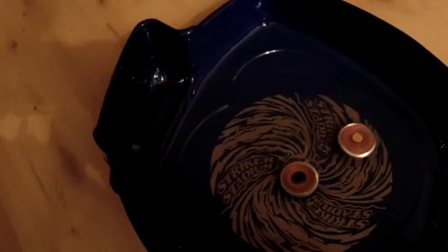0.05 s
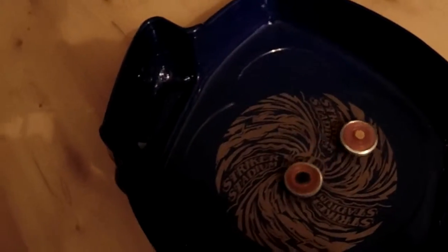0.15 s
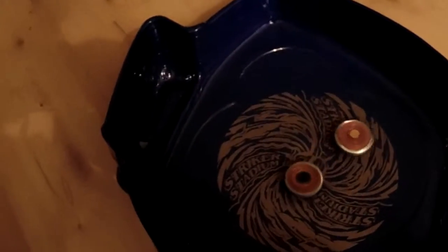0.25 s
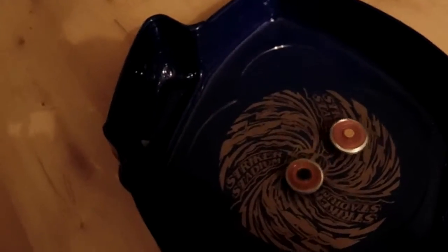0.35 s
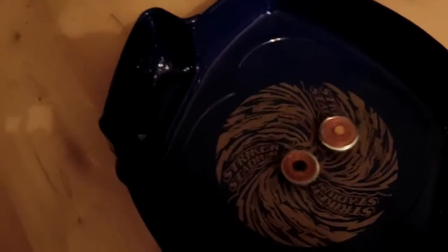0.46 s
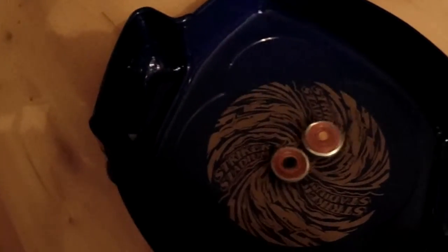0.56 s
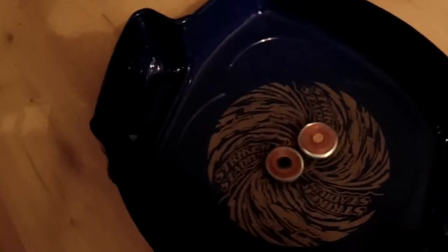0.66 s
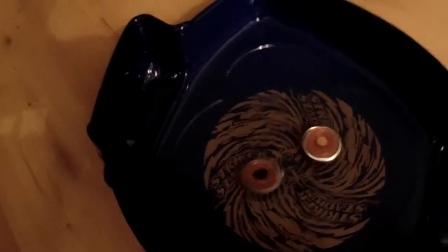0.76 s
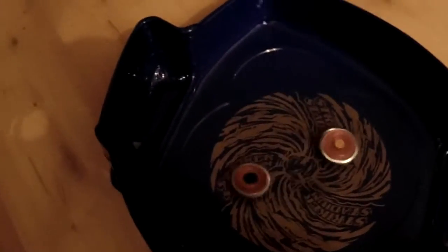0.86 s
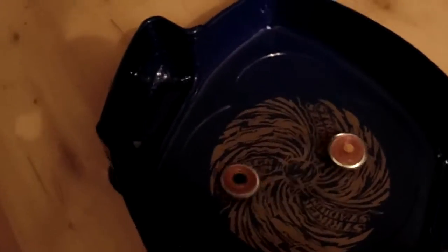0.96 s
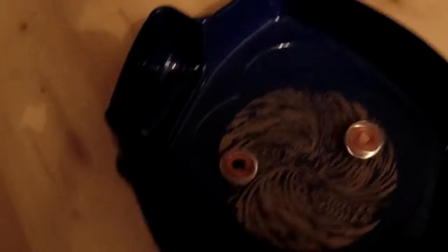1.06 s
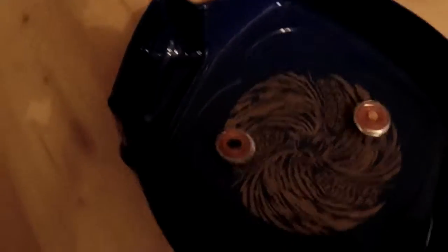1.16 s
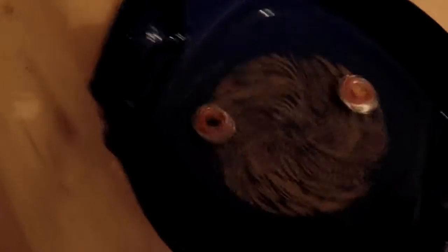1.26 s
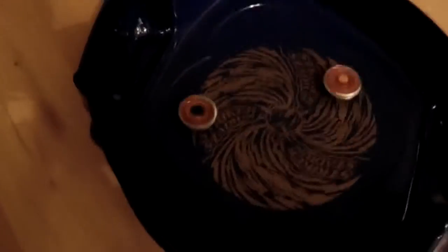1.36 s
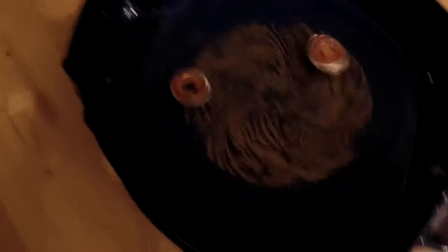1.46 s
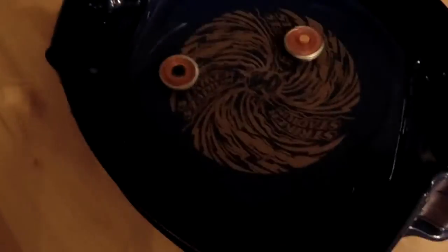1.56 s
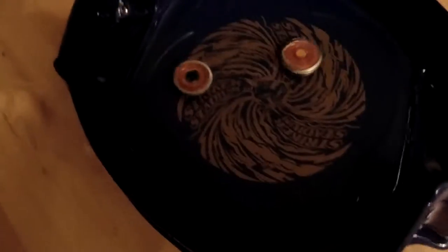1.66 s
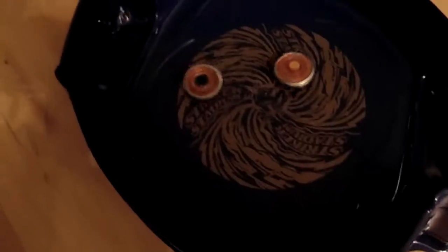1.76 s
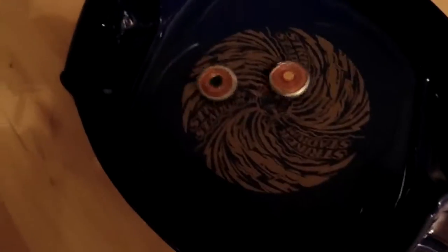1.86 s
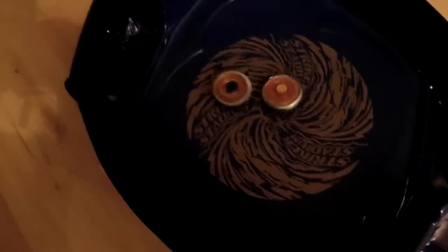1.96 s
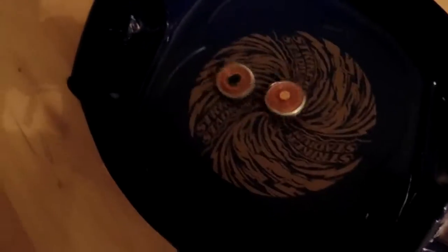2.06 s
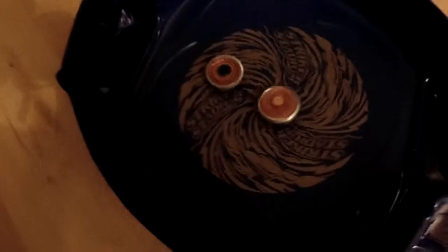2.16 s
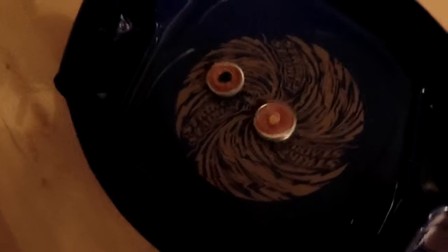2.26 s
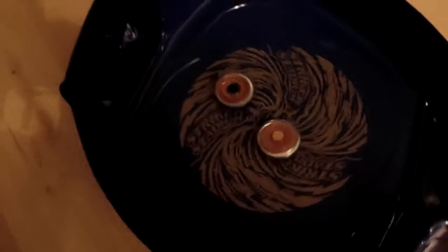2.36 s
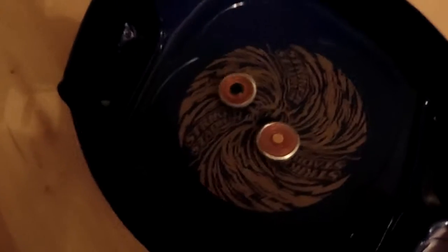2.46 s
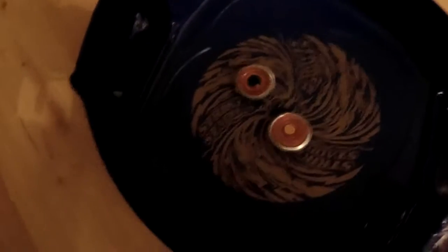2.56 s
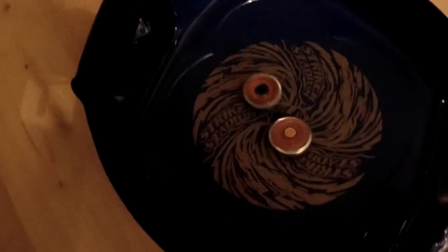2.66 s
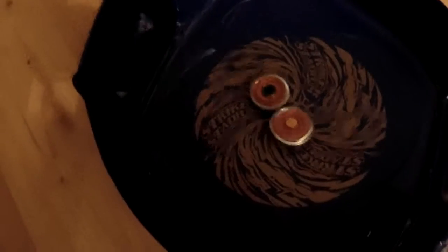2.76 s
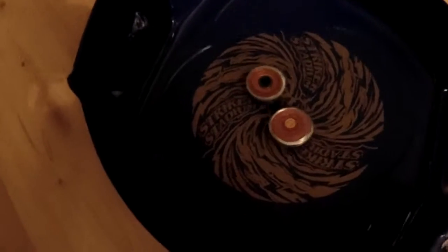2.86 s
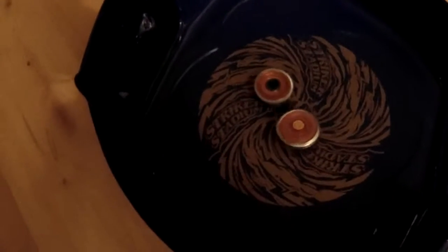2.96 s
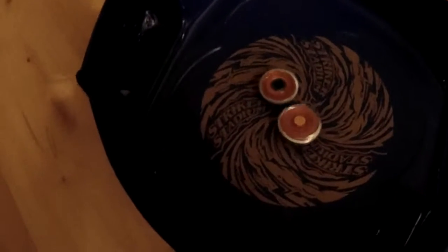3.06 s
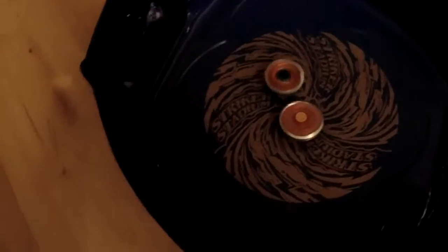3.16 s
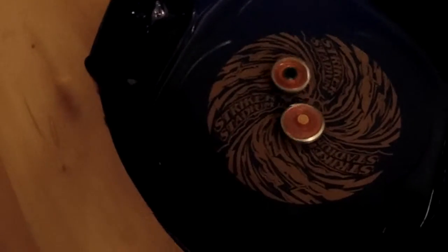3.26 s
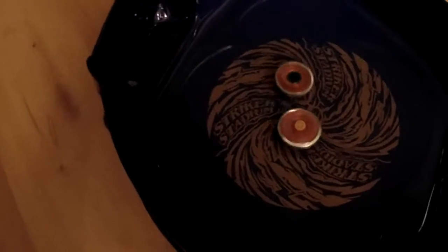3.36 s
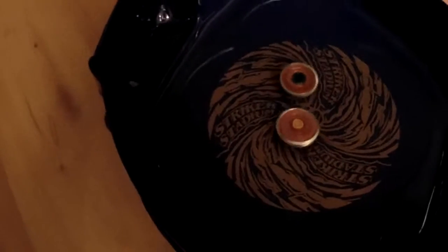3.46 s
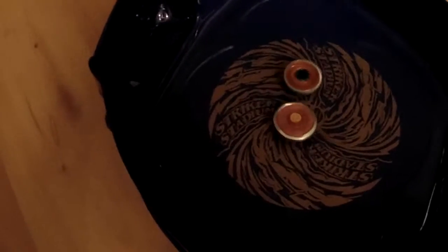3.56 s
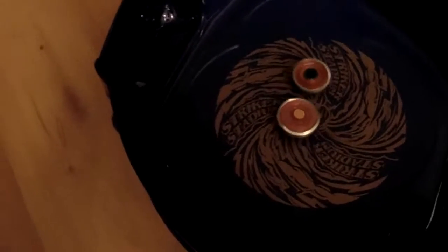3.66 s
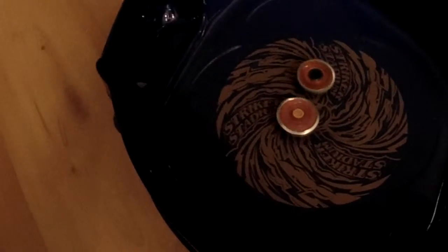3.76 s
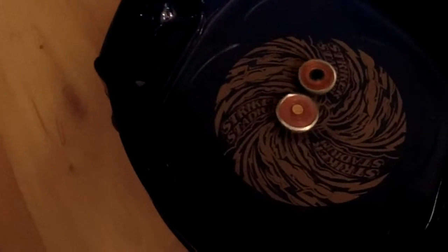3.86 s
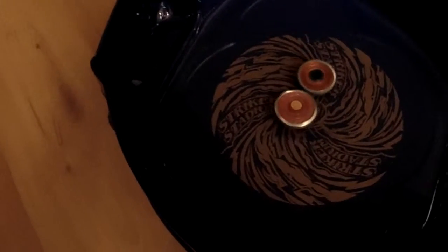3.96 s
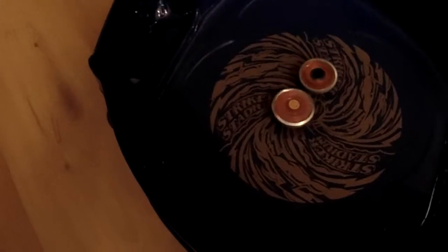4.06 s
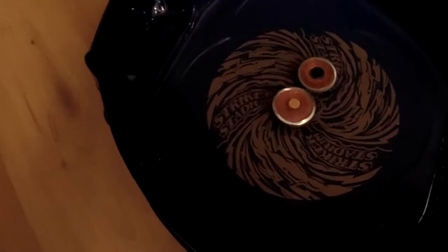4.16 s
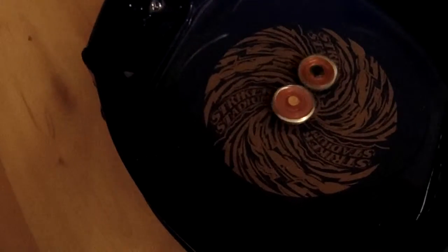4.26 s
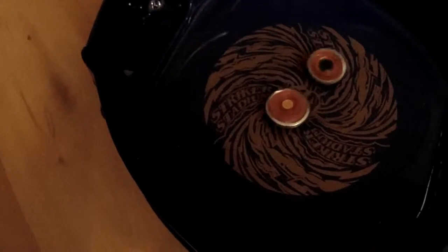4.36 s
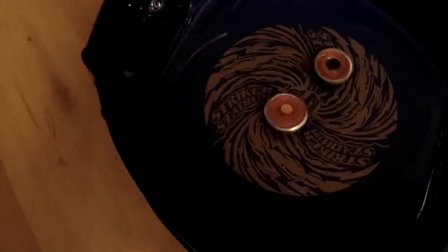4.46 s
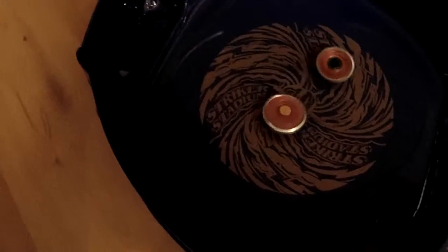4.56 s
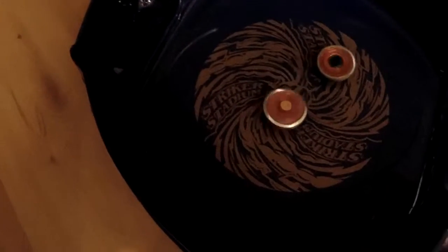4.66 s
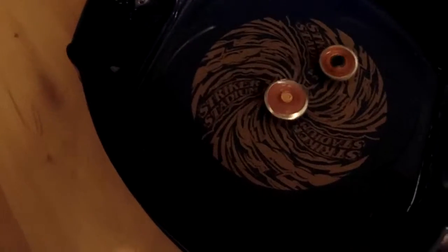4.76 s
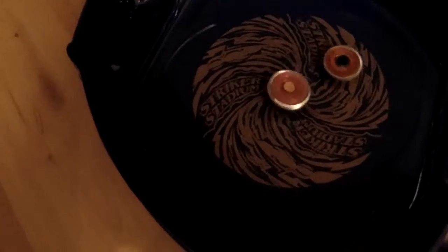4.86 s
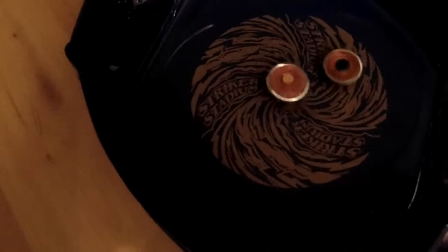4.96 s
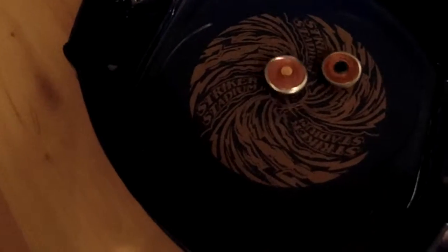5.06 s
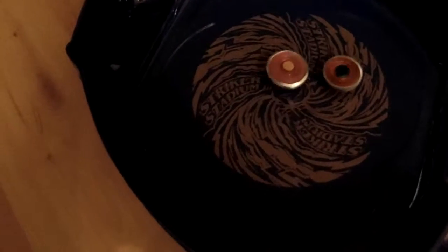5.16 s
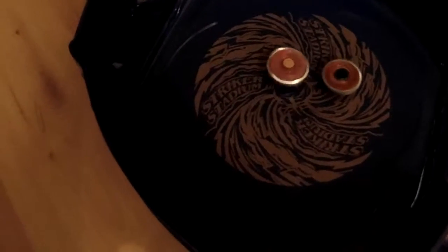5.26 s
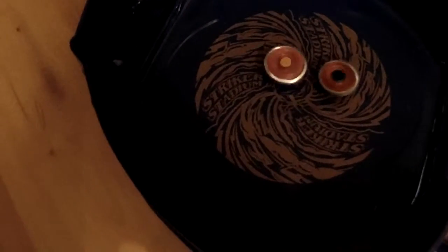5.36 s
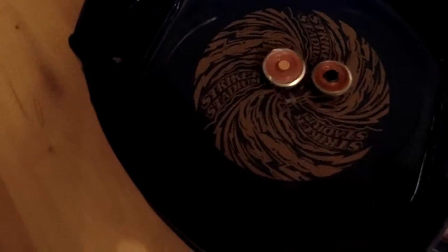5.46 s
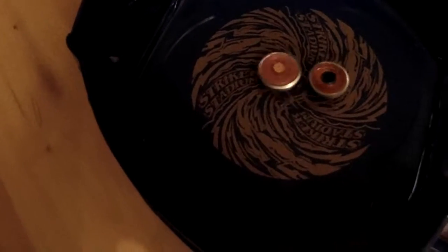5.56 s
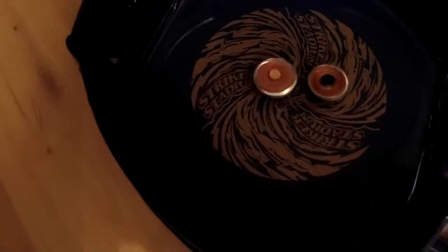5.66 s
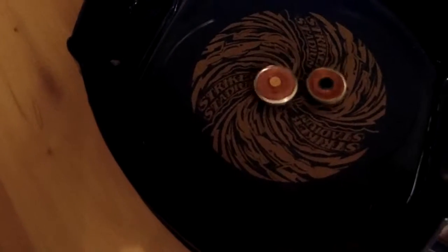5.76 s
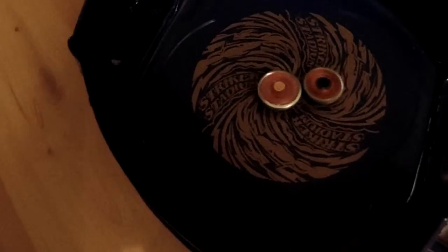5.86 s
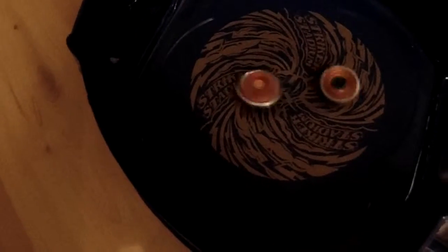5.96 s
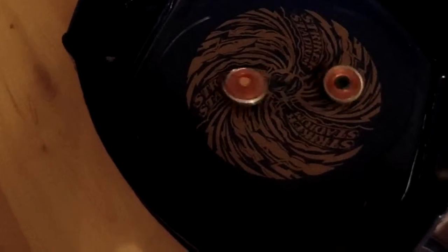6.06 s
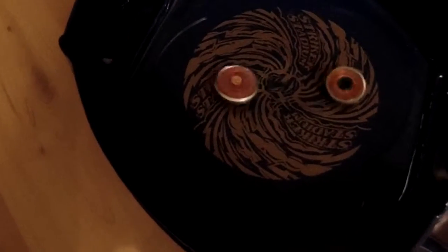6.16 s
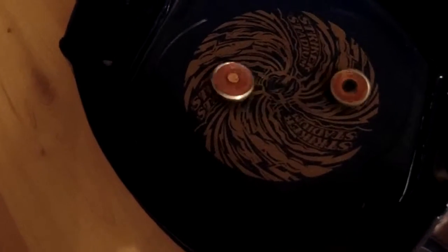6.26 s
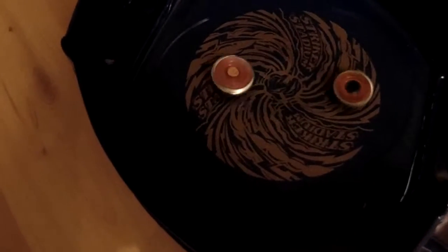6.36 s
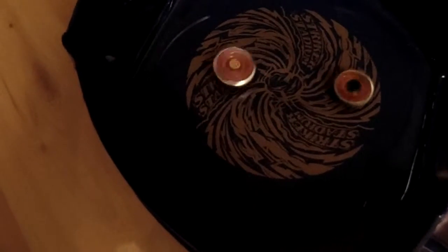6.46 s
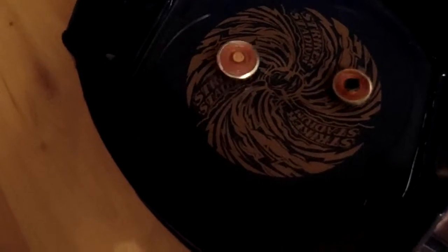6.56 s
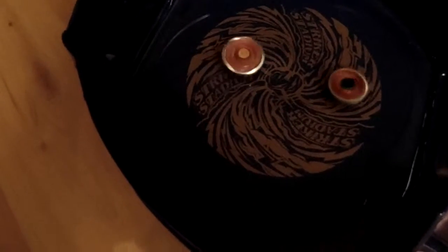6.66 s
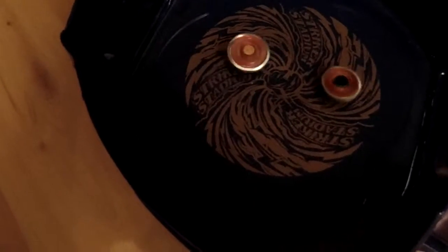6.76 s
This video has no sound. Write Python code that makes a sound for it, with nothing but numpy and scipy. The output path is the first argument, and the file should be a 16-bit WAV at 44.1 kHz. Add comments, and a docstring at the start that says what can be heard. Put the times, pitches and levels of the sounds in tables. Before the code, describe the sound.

Sharp metallic clacks of spinning tops colliding in a plastic arena, over a faint fluttering whirr, tiny bumps, hiss and a few dry plastic clicks.

```python
"""Tips of two metal spinning tops whirr and bump softly on a plastic bowl, over hiss and low room air.
The rims clash ten times, square or glancing: noise crack, decaying metal modes, bowl thud, room echoes and tail.
A few dry plastic clicks, noise ticks with short modes, sound close by.
The hardest clashes turn the recorder's gain down; it creeps back up."""
import sys
import numpy as np
from scipy import signal
from scipy.fft import irfft
from scipy.io import wavfile
from scipy.ndimage import uniform_filter1d

SR = 44100
rng = np.random.default_rng(int(sys.argv[2]) if len(sys.argv) > 2 else 0)


def dump_mix(stems):
    """Bounce the given channels to the path in sys.argv[1] as a 16-bit WAV at rate SR."""
    frames = np.atleast_2d(stems).T  # one column per channel
    limited = np.clip(frames, -1, 1)  # hard clip at full scale
    pcm = np.round(limited * 32767).astype(np.int16)
    wavfile.write(sys.argv[1], SR, pcm)


N = 300762


def gain_of(db):
    """Decibels to amplitude."""
    return 10 ** (np.asarray(db) / 20)


def unit(x):
    """Scales a sound to an energy of one."""
    return x / np.sqrt(np.sum(x ** 2) + 1e-20)


def read(points, hz):
    """Interpolates a table on a logarithmic frequency axis."""
    point_hz, value = np.transpose(points)
    return np.interp(np.log(hz + 1), np.log(point_hz + 1), value)


def fade(t, t60_s):
    """Free decay: 60 dB in t60_s."""
    return np.exp(-np.log(1000) * t / t60_s)


def contact_rise(t, contact_s):
    """Smooth onset while two bodies press together."""
    return 1 - np.exp(-(t / contact_s) ** 2)


def add(mix, start_s, sound):
    """Mixes a sound in at start_s, cut at the end of the mix."""
    part = mix[round(start_s * SR):][:len(sound)]
    part += sound[:len(part)]


def noise(spectrum, size, tilt_db_per_octave=0):
    """Random-phase noise of rms one with a given spectrum, tilted above 1 kHz."""
    hz = np.fft.rfftfreq(size, 1 / SR)
    tilt_db = tilt_db_per_octave * np.log2(np.maximum(hz, 1000))
    height = gain_of(read(spectrum, hz) + tilt_db)
    phase = np.exp(2j * np.pi * rng.random(len(hz)))
    return unit(irfft(height * phase, size)) * np.sqrt(size)


# How hard the tips run over the plastic. Each row: time in seconds, level in dB.
WHIRR_LEVEL = [(0, -59.5), (.6, -61.5), (1, -57.5), (1.65, -59), (2.03, -58), (2.35, -63), (4.1, -65),
               (4.5, -61.5), (5.5, -65), (6, -62), (6.8, -64)]


def running_db(s):
    """How hard the tips run at times s."""
    return np.interp(s, *np.transpose(WHIRR_LEVEL))


# Relative spectrum of tips rubbing plastic. Each row: frequency in Hz, density in dB per Hz.
WHIRR_SPECTRUM = [(100, -21), (200, -1), (300, -1.5), (600, -5), (850, -11.5), (1300, -16.5), (2500, -24),
                  (6000, -32)]


def whirr(flutter=0.1, first_hz=33, last_hz=25):
    """The tips rub the bowl; the rubbing flutters as the tops wobble, ever more slowly on average."""
    drift = unit(uniform_filter1d(rng.standard_normal(N), size=6000)) * np.sqrt(N)
    wobble_hz = np.linspace(first_hz, last_hz, N) * (1 + 0.087 * drift)
    turns = np.cumsum(wobble_hz) / SR
    rubbing = gain_of(running_db(np.arange(N) / SR)) * noise(WHIRR_SPECTRUM, N)
    return rubbing * (1 + flutter * np.sin(2 * np.pi * turns))


# One soft swell of the hiss: middle in seconds, half length in seconds, height in dB.
HISS_SWELL = (1.82, .23, 3)
# Relative spectrum of the hiss. Each row: frequency in Hz, density in dB per Hz.
HISS_SPECTRUM = [(100, 3), (1000, 5.5), (2500, 1.5), (5000, -1.5), (9000, -3.5), (14000, -3.5)]
# Relative spectrum of the room air. Each row: frequency in Hz, density in dB per Hz.
RUMBLE_SPECTRUM = [(5, 7), (25, -2.5), (45, -1.5), (65, -3), (100, -3), (140, -5.5), (250, -13), (600, -22),
                   (2000, -50.5)]


def background(hiss_db=-60, rumble_db=-63):
    """Steady noises: hiss, swelling once, and the low air of the room."""
    middle_s, half_s, swell_db = HISS_SWELL
    swell = np.exp(-((np.arange(N) / SR - middle_s) / half_s) ** 4)
    hiss = gain_of(hiss_db + swell_db * swell) * noise(HISS_SPECTRUM, N)
    return hiss + gain_of(rumble_db) * noise(RUMBLE_SPECTRUM, N)


# Relative spectrum of contact noise on plastic. Each row: frequency in Hz, density in dB per Hz.
TICK_SPECTRUM = [(200, -15), (1200, -4.5), (3500, -7), (8000, -11.5), (14000, -2.5)]


def taps(events, modes, tick_db, tick_t60_s, contact_s=0.00014):
    """Light blows on plastic: a brief tick and a few quickly dying modes."""
    out, t = np.zeros(N), np.arange(2 ** 12) / SR
    rise = contact_rise(t, contact_s)
    for start_s, energy_db in events:
        body = np.zeros(len(t))
        for hz, mode_db, t60_s in modes:
            turns = hz * rng.uniform(1.0, 1.03) * t + rng.random()
            body += gain_of(mode_db) * unit(fade(t, t60_s) * np.sin(2 * np.pi * turns))
        tick = noise(TICK_SPECTRUM, len(t)) * fade(t, tick_t60_s)
        blow = unit(rise * body) + gain_of(tick_db) * unit(rise * tick)
        add(out, start_s, gain_of(energy_db) * blow)
    return out


def small_bumps(bumps_per_s=30, over_whirr_db=22, spread_db=5):
    """Rows (s, energy dB) of chance bumps, stronger while the tips run harder."""
    when, size = rng.random((round(bumps_per_s * N / SR), 2)).T
    start_s = when * (N - 1) / SR
    energy_db = running_db(start_s) + over_whirr_db + spread_db * (2 * size - 1)
    return list(zip(start_s, energy_db))


# Single bumps of a tip over the bowl's surface. Each row: start in seconds, energy in dB before the tick.
SINGLE_BUMPS = [(.637, -25), (.701, -23.5), (.734, -26), (1.948, -27), (2.062, -30), (4.965, -31.5),
                (5.002, -31), (5.81, -34)]
# Modes of the bowl under a tip. Each row: lowest frequency in Hz, relative energy in dB, t60 in seconds.
BOWL_MODES = [(436, -9, .04), (620, 1, 0.024), (756, -4, 0.019), (940, -11, .02)]


def bumps():
    """Tips hop on the bowl and excite its low, short modes."""
    return taps(SINGLE_BUMPS + small_bumps(), BOWL_MODES, tick_db=-15, tick_t60_s=0.013)


# Modes of the metal rims, one list a family excited together: low clink, body ring, long ring, clank,
# high ping, and modes driven alike in every clash.
# Each row: frequency in Hz, energy in dB against the crack before the contact's own dB, t60 in seconds.
RIM_MODES = [
    [(3350, -12, 0.061), (5100, -23, .04), (11400, -20.5, 0.036)],
    [(4160, -8.5, 0.24), (8300, -18.5, 0.27)],
    [(4398, -8, 0.25)],
    [(5698, -10, 0.012)],
    [(11010, -4, .016)],
    [(2225, -18.5, 0.028), (3213, -9.5, 0.014), (3910, -6, 0.016), (4850, -22, 0.093), (7880, -16.5, 0.076),
     (8370, -14.5, 0.1), (8890, -12.5, 0.065), (9514, -3, .008), (12430, 1, 0.0088), (13920, -2.5, 0.0054)],
]


def rim_ring(t, contact_db, spin_hz=26, whirl_s=.00003):
    """Rims ring in a mix set by the contact point; spin swings the path to the microphone: tones warble."""
    ring = np.zeros(len(t))
    for family, extra_db in zip(RIM_MODES, [*contact_db, 0]):
        for hz, db, t60_s in family:
            start, angle = rng.random(2)
            heard_s = t + whirl_s * np.sin(2 * np.pi * (spin_hz * t + angle))
            tone = np.sin(2 * np.pi * (hz * heard_s + start))
            ring += gain_of(db + extra_db) * unit(fade(t, t60_s) * tone)
    return ring


# Echoes from the bowl's wall and the floor. Each row: nominal delay in seconds, level in dB.
ECHOES = [(.0056, -20), (.0074, -17), (0.0117, -13.5), (0.015, -17.5), (.0192, -23)]
# Room decay. Each row: frequency in Hz, t60 in seconds.
ROOM_DECAY = [(250, 0.27), (1000, 0.3), (3000, 0.29), (6000, 0.28), (10000, 0.27), (14000, 0.22)]


def room(t, wet_db=-4, build_s=0.0024):
    """Direct sound, a few echoes and a diffuse tail; new for every place of the tops."""
    hz, at_s, z = signal.stft(rng.standard_normal(len(t)), SR, nperseg=256)
    decaying = z * fade(at_s, read(ROOM_DECAY, hz)[:, None])
    tail = signal.istft(decaying, SR, nperseg=256)[1][:len(t)]
    response = gain_of(wet_db) * unit(tail * contact_rise(t, build_s))
    response[0] += 1
    for delay_s, db in ECHOES:
        add(response, delay_s * rng.uniform(0.94, 1.05), gain_of([db]))
    return response


# Each row: start in seconds, crack energy in dB, glance from 0 square to 1 grazing, then how strongly
# the contact point excites low clink, long ring, clank and high ping, in dB.
CLASHES = [ (0.662, 1.5, 0.69, 12, -13, -9, -14), (0.7668, 4, .25, 2, -4, 9, 7.5),
           (2.085, 5, .62, 0, 2.5, 9, 11), (2.834, 1.5, 0.11, -7.5, -17, 10, 8.5),
           (3.1635, -5.5, 0.11, -10, -4, 9.5, -5), (4.01, -8, 0.86, 12, 5.5, -2.5, 8),
           (4.2562, -8.5, 0.28, -2, 10.5, 6.5, 5), (4.327, -2.5, 0, 5, 6, 15, 7),
           (5.5875, -0.45, 0.43, -19, 6, -0.5, -19.5), (5.9402, 6, 0.69, -7.5, 5.5, 10.5, 4.5)]
# Square blows are dull and shake top and bowl, grazing ones thin and bright. Each pair: square, grazing.
# Crack tilt in dB per octave, thud energy in dB against the crack, body ring excitation in dB.
CRACK_TILT_DB_PER_OCTAVE = (-5, 6.5)
THUD_DB = (-16, -27)
BODY_RING_DB = (8.5, -13.5)
# Relative spectrum of the crack before tilt. Each row: frequency in Hz, density in dB per Hz.
CRACK_SPECTRUM = [(300, -34), (1200, -26.5), (1800, -16), (2300, -6.5), (3100, 4), (4000, 1.5), (5000, 5.5),
                  (6300, -8.5), (7400, -3.5), (9000, 0), (10500, -8), (12000, -1), (14000, -15)]
# Relative spectrum of the bowl kicked through the tips. Each row: frequency in Hz, density in dB per Hz.
THUD_SPECTRUM = [(60, -39.5), (170, -7.5), (300, 0), (600, 1), (900, -8.5), (1500, -4), (3000, -30.5)]


def clashes(crack_t60_s=0.021, contact_s=0.00033, thud_t60_s=0.065):
    """Rim meets rim: the loose parts crack, the metal rings and the bowl thuds."""
    out, t = np.zeros(N), np.arange(2 ** 14) / SR
    rise = contact_rise(t, contact_s)
    for start_s, energy_db, glance, clink_db, long_db, clank_db, ping_db in CLASHES:
        tilt_db = np.interp(glance, [0, 1], CRACK_TILT_DB_PER_OCTAVE)
        thud_db = np.interp(glance, [0, 1], THUD_DB)
        body_db = np.interp(glance, [0, 1], BODY_RING_DB)
        crack = unit(noise(CRACK_SPECTRUM, len(t), tilt_db) * rise * fade(t, crack_t60_s))
        thud = gain_of(thud_db) * unit(noise(THUD_SPECTRUM, len(t)) * rise * fade(t, thud_t60_s))
        ring = rise * rim_ring(t, [clink_db, body_db, long_db, clank_db, ping_db])
        clash = signal.fftconvolve(crack + thud + ring, room(t))
        add(out, start_s, gain_of(energy_db) * clash)
    return out


# Dry clicks near the microphone. Each row: start in seconds, energy in dB before the tick.
CLICKS = [(2.4885, -29), (2.5172, -23.5), (2.5395, -11), (2.5427, -1.5), (2.5528, -15.5), (2.5693, -23),
          (4.979, -28)]
# Modes of that plastic. Each row: lowest frequency in Hz, relative energy in dB, t60 in seconds.
PLASTIC_MODES = [(1080, -2, 0.078), (1368, 3, 0.019), (1780, 4, 0.037), (2010, -3, 0.041), (2650, 5, 0.024),
                 (4350, -2.5, 0.015)]


def clicks():
    """Plastic clicks close by: contact noise and short modes, without room."""
    return taps(CLICKS, PLASTIC_MODES, tick_db=-6.5, tick_t60_s=0.018)


def scene():
    """All sources at one microphone."""
    return (whirr() + background() + bumps() + clashes() + clicks())[None]


def gain_control(x, threshold_db=-19, duck_share=0.92, duck_s=0.11, recover_db_per_s=2.5):
    """Power above the threshold turns the gain down with a lag; it recovers at a steady pace."""
    power = abs(uniform_filter1d(x[0] ** 2, size=441))  # 10 ms mean
    power_db = 10 * np.log10(power + 1e-12)
    recovered_db = recover_db_per_s * np.arange(N) / SR
    wanted_db = duck_share * np.maximum(power_db - threshold_db, 0)
    duck_db = np.maximum.accumulate(wanted_db + recovered_db) - recovered_db
    lag = np.exp(-1 / (duck_s * SR))
    return x * gain_of(-signal.lfilter([1 - lag], [1, -lag], duck_db))


def record(dry, edge_hz=14270):
    """Gain control; the hardest peaks flatten just under full scale; then the band limit."""
    held = np.clip(gain_control(dry), -.92, .92)
    lowpass = signal.firwin(401, edge_hz, window=("kaiser", 8), fs=SR)
    return signal.oaconvolve(held, lowpass[None], "same")


dry = scene()
out = record(dry)
dump_mix(out)
```